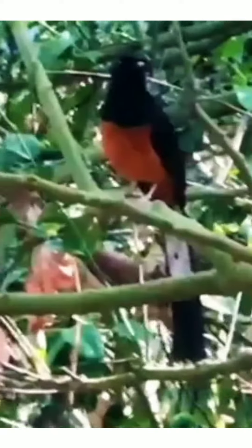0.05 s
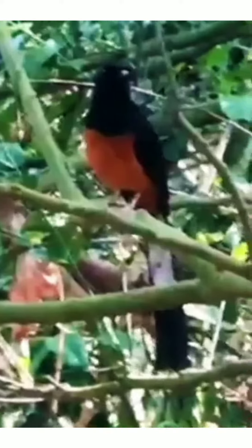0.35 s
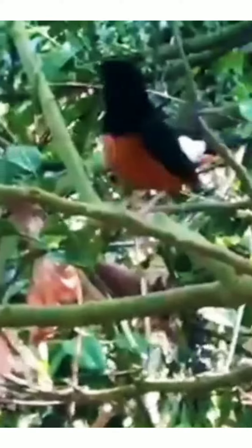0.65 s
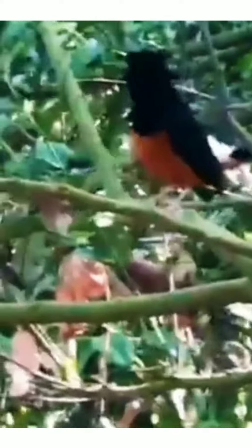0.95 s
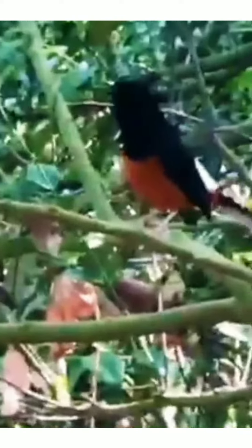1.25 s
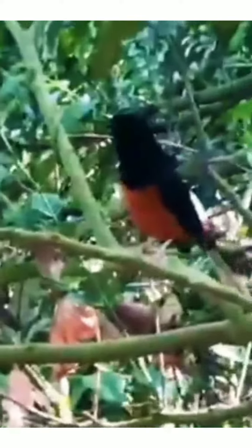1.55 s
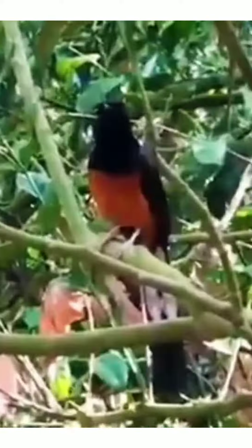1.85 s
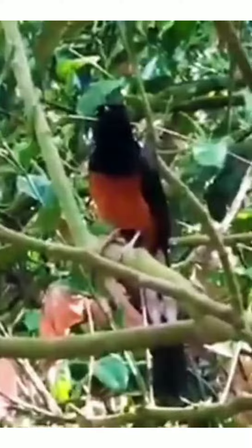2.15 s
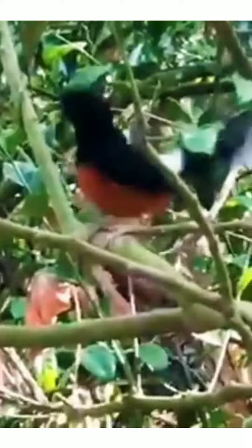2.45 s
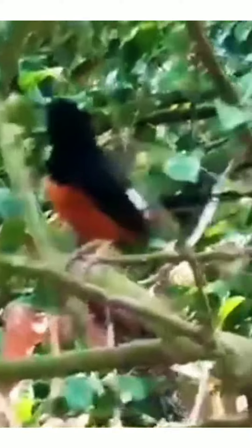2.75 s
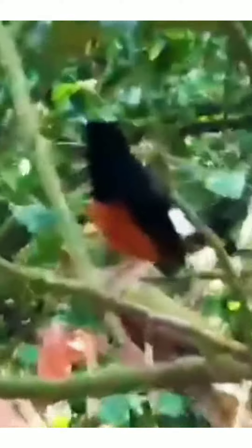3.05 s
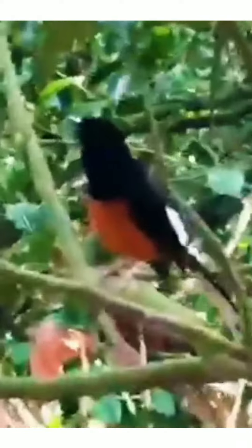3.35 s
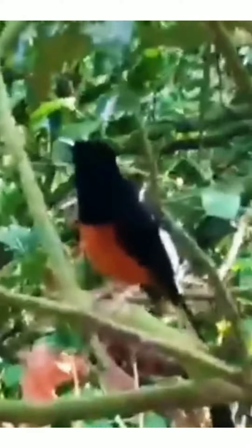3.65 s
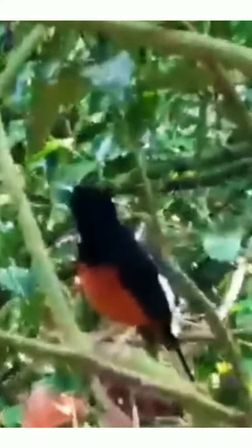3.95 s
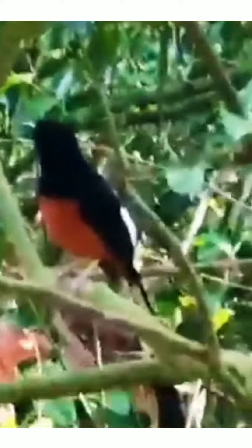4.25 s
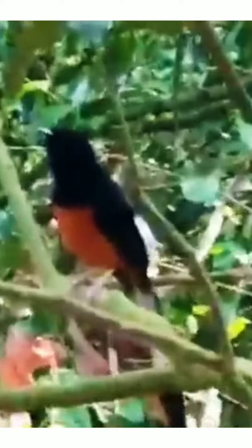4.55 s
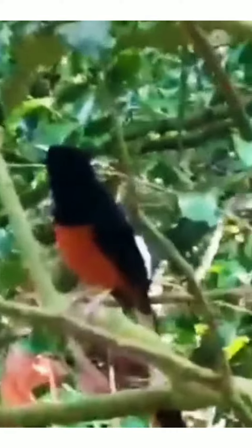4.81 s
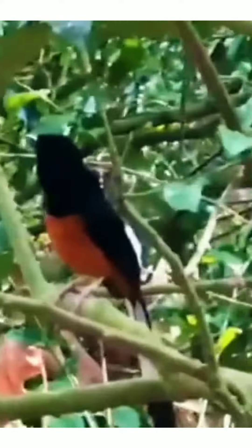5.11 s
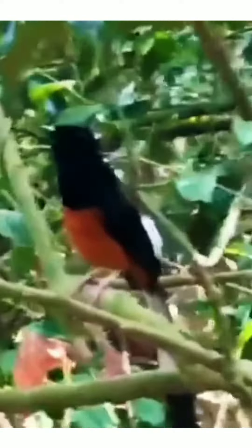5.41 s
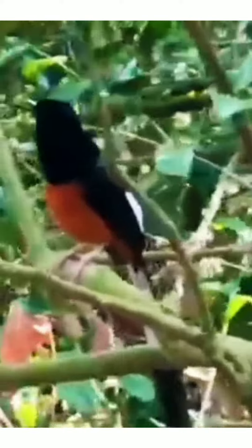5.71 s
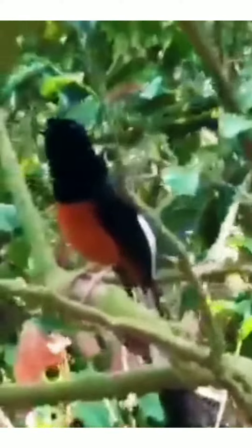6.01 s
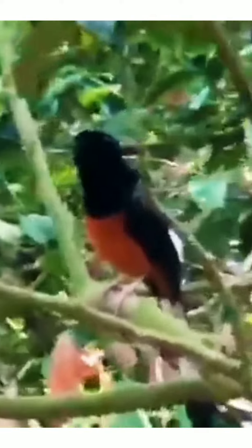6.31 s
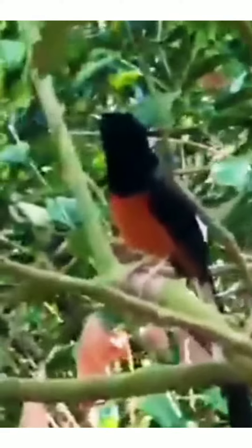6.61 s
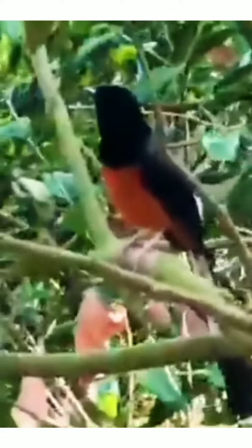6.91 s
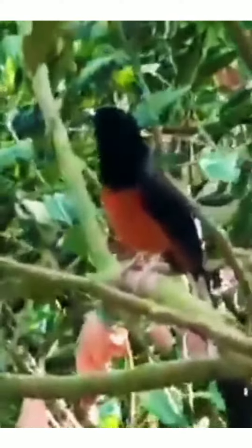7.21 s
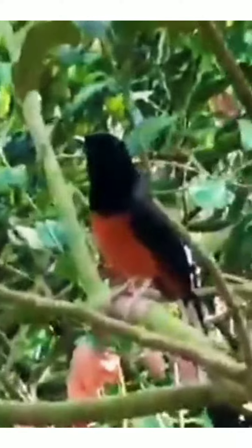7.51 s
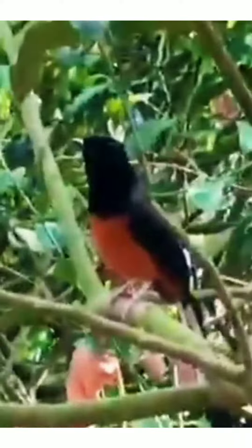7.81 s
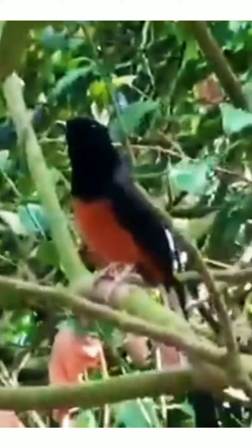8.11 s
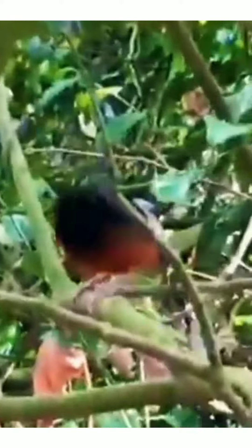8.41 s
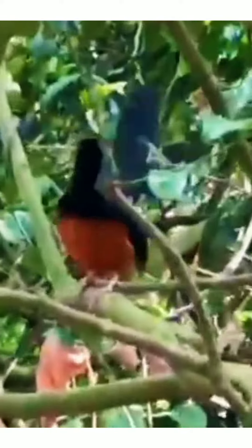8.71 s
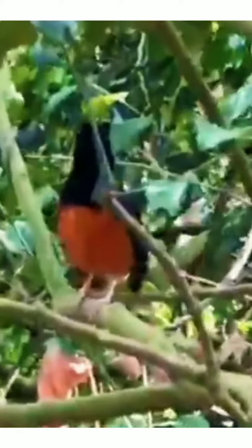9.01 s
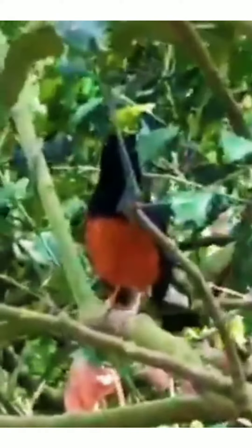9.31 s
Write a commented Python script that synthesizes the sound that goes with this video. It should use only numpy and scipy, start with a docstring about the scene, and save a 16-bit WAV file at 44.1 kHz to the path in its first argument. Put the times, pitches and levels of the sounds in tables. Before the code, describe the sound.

A songbird sings close by with thin high notes, dry clicking calls, loud whistles and fast warbles over a quiet outdoor rumble.

```python
"""A shama sings close by in leafy branches, over a quiet rumble and a far twitter. It opens with thin high
notes, arched notes and low rasps, all tones of its syrinx; twigs tick. Runs of dry 'tuk' calls come at
1.3 and 3.3 s, a harsh double 'chack' at 3.9 s, then pure whistles, arches, fast warbles and a swoop.
Softer song answers from further off, mostly at 7-8.7 s; a whistle and a warble close near 9 s.
Nearby surfaces echo the song."""
import sys
import numpy as np
from scipy import signal
from scipy.fft import rfft, irfft
from scipy.io import wavfile
from scipy.ndimage import uniform_filter1d

SR = 44100
rng = np.random.default_rng(int(sys.argv[2]) if len(sys.argv) > 2 else 0)


def dump(signal):
    """Clip the signal to [-1, 1] and save it as 16-bit WAV at the path in sys.argv[1]."""
    limited = np.clip(np.atleast_2d(signal).T, -1, 1)
    pcm = np.round(limited * 32767).astype(np.int16)
    wavfile.write(sys.argv[1], SR, pcm)


N = 417186

# spectrum of chacks and twig ticks: f/Hz, gain/dB
CRACK_SPECTRUM = [(410, -70), (700, -20.5), (952, -23), (1650, -1.5), (2340, 1), (3570, -7), (4320, -2),
                  (5310, -3.5), (6350, -6.5), (8000, -8), (10200, -18), (12700, -13.5), (15000, -24)]


def undb(db):
    """Decibels to gain."""
    return 10 ** (np.asarray(db) / 20)


def unit(x):
    """Scale to rms 1."""
    return x / np.sqrt(np.mean(x ** 2) + 1e-18)


def add(out, start_s, x):
    """Mix x into out from start_s on."""
    i = max(int(start_s * SR), 0)
    out[i:i + len(x)] += x[:max(len(out) - i, 0)]


def gain_at(hz, curve):
    """Gain of an (f/Hz, gain/dB) curve on a log-frequency axis."""
    f_hz, db = np.transpose(curve)
    return undb(np.interp(np.log(hz + 1), np.log(f_hz), db))


def colour(x, curve):
    """Filter by an (f/Hz, gain/dB) curve."""
    hz = np.arange(len(x) // 2 + 1) * SR / len(x)
    return irfft(rfft(x) * gain_at(hz, curve), len(x))


def ring(x, hz, width_hz):
    """One resonance, gain 1 at its centre."""
    return signal.lfilter(*signal.iirpeak(hz, hz / width_hz, fs=SR), x)


def wander(size, hz):
    """Random drift up to about hz, rms near 1."""
    knots = rng.standard_normal(4096)
    return np.sqrt(3 / 2) * np.interp(np.arange(size) * 2 * hz / SR, np.arange(len(knots)), knots)


def burst(t60_s, rise_s):
    """Noise with a linear rise and exponential decay."""
    t = np.arange(SR // 4) / SR
    decay = undb(-60 * np.maximum(t - rise_s, 0) / t60_s)
    return rng.standard_normal(len(t)) * np.minimum(t / rise_s, 1) * decay


def fade(x, edge_s):
    """Ramp both ends."""
    i = np.arange(len(x))
    return x * np.clip(np.minimum(i, i[::-1]) / (edge_s * SR), 0, 1)


def progress(length_s):
    """0 to 1 through a note."""
    return np.linspace(0, 1, max(int(length_s * SR), 2))


def glide(u, from_hz, to_hz):
    """Even slide in log pitch."""
    return from_hz * (to_hz / from_hz) ** u


def swell(u, peak_at, rise_db, fall_db, curve=1.42):
    """Air pressure in dB re peak: one rise, one fall."""
    before_db = rise_db * np.abs(1 - u / peak_at) ** curve
    after_db = fall_db * np.abs((u - peak_at) / (1 - peak_at)) ** curve
    return -np.where(u < peak_at, before_db, after_db)


def gesture(points, smooth_s=.0027):
    """Start time and smoothed muscle controls from (t/s, ...) points."""
    times_s, *columns = np.transpose(points)
    t = np.arange(times_s[0], max(times_s[-1], times_s[0] + smooth_s), 1 / SR)
    return times_s[0], [uniform_filter1d(np.interp(t, times_s, c), int(smooth_s * SR)) for c in columns]


def syrinx(hz, db, overtone_db, jitter, flutter, jitter_hz=250):
    """Near-sine membrane tone; weak, unsteady overtones pass the fixed throat resonances."""
    # overtones through throat and beak: f/Hz, level/dB re fundamental
    throat = [(2000, -25.5), (3000, -40.5), (4100, -55), (5300, -39.5), (6700, -40), (8100, -36.5),
              (9400, -30), (10700, -37.5), (11800, -38.5), (13300, -42), (15500, -45)]
    hz = hz * (1 + jitter * wander(len(hz), jitter_hz))
    phase = 2 * np.pi * np.cumsum(hz) / SR
    tone = np.sin(phase)
    for k in range(2, 9):
        strength = undb(overtone_db + 6.5 * wander(len(hz), hz=70))
        tone += strength * gain_at(np.abs(k * hz), throat) * (k * hz < SR / 2) * np.sin(k * phase)
    gain = undb(db) * np.exp(flutter * wander(len(hz), jitter_hz))
    return np.sqrt(2) * gain * fade(tone, edge_s=.0025)


def strained(hz, db, strain):
    """Strain (0-1) turns a pure note bright and ragged."""
    return syrinx(hz, db, overtone_db=15 * strain, jitter=.002 + .05 * strain,
                  flutter=.034 + .2 * strain, jitter_hz=220)


def plain_notes(notes, **voice):
    """Syrinx notes that follow (t/s, f/Hz, level/dB) points."""
    out = np.zeros(N)
    for note in notes:
        start_s, (hz, db) = gesture(note)
        add(out, start_s, syrinx(hz, db, **voice))
    return out


def air(level_db=-47):
    """Quiet, steady outdoor rumble."""
    # f/Hz, gain/dB
    spectrum = [(15, -51.5), (25, -26), (49, -2), (224, -3.5), (438, -13), (543, -12.5), (588, -14),
                (637, -14), (1860, -18.5), (2780, -24), (3350, -22), (4040, -26.5), (5140, -32),
                (7090, -30), (15000, -40)]
    return undb(level_db) * unit(colour(rng.standard_normal(N), spectrum))


def scatter(x, t60_s, onset_s):
    """Diffuse tail of the surroundings."""
    # f/Hz, gain/dB
    spectrum = [(200, -13), (1000, -4), (2200, -5.5), (4500, 6.5), (9000, -0.5), (15000, 6)]
    t = np.arange(SR) / SR
    envelope = np.minimum(t / onset_s, 1) * undb(-60 * t / t60_s)
    tail = colour(rng.standard_normal(SR), spectrum) * envelope
    return signal.fftconvolve(x, unit(tail) / np.sqrt(SR))[:N]


def reflections(x):
    """Direct sound plus echoes off the nearest surfaces."""
    # delay/s, gain/dB
    echoes = [(.0032, -21), (.0056, -11.5), (.0094, -15), (0.0158, -17.5), (0.029, -22.5)]
    out = x.copy()
    for delay_s, db in echoes:
        add(out, delay_s, undb(db) * x)
    return out


def far_slides(notes, edge_db, **voice):
    """Distant notes: one even slide each, loudest in the middle."""
    out = np.zeros(N)
    for start_s, length_s, from_hz, to_hz, db in notes:
        u = progress(length_s)
        add(out, start_s, syrinx(glide(u, from_hz, to_hz), db - edge_db * (2 * u - 1) ** 2, **voice))
    return out


def far_tones():
    """Faint low tones from far away."""
    # t/s, length/s, from/Hz, to/Hz, level/dB
    notes = [(2.55, .3, 728, 754, -54.5), (3.15, .32, 665, 600, -53.5), (7.76, 0.51, 611, 623, -59),
             (8.26, .12, 960, 1050, -52), (8.56, .12, 534, 550, -53), (8.8, 0.67, 689, 605, -60)]
    return far_slides(notes, edge_db=7, overtone_db=-.5, jitter=.012, flutter=.57, jitter_hz=40)


def far_twitter():
    """A distant high note that wavers."""
    # t/s, f/Hz, level/dB, swing/Hz, rate/Hz
    points = [(0, 3960, -60, 220, 13.5), (.35, 3880, -57.5, 300, 5.8), (.67, 3880, -54, 253, 9.8)]
    out = np.zeros(N)
    start_s, (hz, db, swing_hz, rate_hz) = gesture(points)
    waver_hz = swing_hz * np.cos(2 * np.pi * np.cumsum(rate_hz) / SR)
    add(out, start_s, syrinx(hz - waver_hz, db, overtone_db=-9, jitter=.022, flutter=.017))
    return out


def far_song():
    """Soft slides of the far singer."""
    # t/s, length/s, from/Hz, to/Hz, level/dB
    notes = [ (0, 0.063, 1764, 1700, -44), (2.08, .14, 2770, 3200, -48), (4.84, .1, 1954, 1458, -32),
             (5.0, .1, 1348, 2100, -29.5), (5.09, .19, 2700, 3050, -44.5), (5.28, 0.22, 3033, 3227, -41),
             (5.465, .025, 3100, 2300, -34), (5.68, .07, 2060, 1480, -28), (7.07, .1, 2600, 2670, -50),
             (7.17, .09, 2710, 2760, -39), (7.35, .11, 2190, 2120, -36), (7.44, .11, 2160, 2330, -37),
             (7.58, .1, 2080, 1475, -33.5), (7.57, 0.17, 2180, 2425, -41.5), (7.74, .14, 1428, 2202, -29),
             (7.87, .14, 2675, 3130, -41.5), (8.05, .06, 1430, 1720, -35), (8.1, .075, 1850, 2700, -39),
             (8.1, .16, 3098, 3258, -38.5), (8.395, 0.023, 2235, 2345, -36), (8.425, .07, 1900, 1046, -41),
             (8.495, 0.064, 2000, 1333, -27.5), (8.555, 0.071, 2050, 1480, -30),
             (8.61, 0.17, 1530, 1397, -40), (8.645, 0.088, 1897, 3110, -37), (9.18, 0.052, 3000, 3294, -37),
             ]
    return far_slides(notes, edge_db=14, overtone_db=-7.5, jitter=.014, flutter=.3, jitter_hz=120.2)


def twigs(knock_rise_s=.005):
    """Dry ticks of twigs and leaves, and a few dull knocks."""
    # t/s, level/dB
    tick_events = [(0.558, -27), (0.655, -26.5), (1.274, -27), (2.102, -32), (2.195, -31), (2.895, -23),
                   (2.918, -23), (5.52, -31), (4.03, -38), (6.872, -47), (7.066, -44), (7.414, -33),
                   (8.136, -25.5), (8.521, -18.5), (8.531, -28), (8.698, -29.5)]
    # t/s, f/Hz, level/dB
    knock_events = [(2.9, 343, -39), (2.92, 320, -30), (3.481, 266, -33), (3.506, 220, -33)]
    ticks, knocks = np.zeros(N), np.zeros(N)
    for start_s, db in tick_events:
        add(ticks, start_s, undb(db) * burst(t60_s=.025, rise_s=.0026))
    t = np.arange(SR // 4) / SR
    blow = t / knock_rise_s * np.exp(1 - t / knock_rise_s)
    for start_s, hz, db in knock_events:
        body = unit(ring(rng.standard_normal(len(t)), hz, width_hz=260))
        add(knocks, start_s, undb(db) * body * blow)
    return undb(3) * colour(ticks, CRACK_SPECTRUM) + knocks


def chacks():
    """Harsh chacks and bill snaps: broadband cracks, each trailing a hoarse hiss."""
    # t/s, level/dB, t60/s
    calls = [(2.381, -26.5, 0.057), (2.392, -47, .02), (3.858, -27, 0.064), (3.873, -7.5, 0.013),
             (3.925, -10.5, 0.031), (3.935, -15.5, 0.038)]
    out = np.zeros(N)
    for start_s, db, t60_s in calls:
        crack = burst(t60_s, rise_s=.0035)
        hiss = undb(-12) * burst(t60_s=.27, rise_s=.0062)
        add(out, start_s, undb(db) * (crack + hiss))
    return undb(5) * colour(out, CRACK_SPECTRUM)


def tuks(peak_s=.0051, length_s=.0094):
    """Each 'tuk' is a steep downward flick, with no bass below about 850 Hz."""
    # t/s, level/dB, f/Hz
    calls = [(1.3144, -16, 2060), (1.3736, -16, 2130), (1.4346, -17, 2043), (1.499, -18.5, 1930),
             (1.5564, -20, 2020), (1.6274, -20.5, 2065), (1.702, -23.5, 1990), (3.256, -13, 2050),
             (3.3282, -13.5, 1963), (3.3852, -15, 1920), (3.4451, -15.5, 1900), (3.509, -15.5, 1990),
             (3.5721, -18.5, 1985)]
    notes = [[(t, hz, db - 12), (t + peak_s, hz, db - .5), (t + length_s, .88 * hz, db - 12)]
             for t, db, hz in calls]
    flicks = plain_notes(notes, overtone_db=5, jitter=.08, flutter=.2, jitter_hz=500)
    return signal.sosfilt(signal.butter(4, 850, "high", fs=SR, output="sos"), flicks)


def zing(length_s, hz, db, hop_s=.042, settle_s=.035, flick_s=.012):
    """Pitch, level, buzz swing of a held note: overshoots, swells as the buzz narrows, flicks down."""
    u = progress(length_s)
    t = u * length_s
    pressure_db = swell(u, peak_at=.72, rise_db=16, fall_db=5)
    hop_oct = .25 * np.cos(2 * np.pi * t / hop_s) * np.exp(-t / settle_s)
    flick_oct = .2 * np.maximum(1 - (length_s - t) / flick_s, 0)
    swing_hz = 100 - 16 * pressure_db
    return hz / 2 ** (hop_oct + flick_oct), db + pressure_db, swing_hz


def tsip(length_s, hz, db, swing_hz=240, climb_oct=.14, fall_oct=.52, fall_at=.75):
    """Pitch, level, buzz swing of a two-beat note that falls away."""
    u = progress(length_s)
    fall = np.maximum(u - fall_at, 0) / (1 - fall_at)
    bend_oct = climb_oct * (u - .5) - fall_oct * fall
    gap_db = 15 * np.cos(2 * np.pi * u) ** 2 * (1 - fall / 4)
    return hz * 2 ** bend_oct, db - gap_db, swing_hz


def thin_notes(buzz_hz=130):
    """High side of the syrinx: rising lisps and buzzing notes ring a narrow resonance."""
    # t/s, level/dB
    lisps = [(.828, -32), (0.861, -34), (0.913, -27.5), (0.969, -30), (1.033, -33.5), (1.094, -31.5),
             (4.903, -37.5), (4.967, -35.5), (5.023, -34.5), (5.079, -36), (5.135, -35.5), (5.192, -39.5)]
    # both: t/s, length/s, f/Hz, level/dB
    zings = [(.69, .138, 4172, -23.5), (3.059, .12, 4270, -27.5), (3.358, .149, 4231, -24.5),
             (4.609, .165, 4374, -25.5), (6.547, .143, 4338, -24.5)]
    tsips = [(.422, 0.1, 5550, -31), (1.862, .1, 5330, -29), (2.72, .11, 5100, -43),
             (4.38, .122, 5204, -30), (6.296, 0.11, 5240, -30.5)]
    rises = [[(t, 4600, db - 7), (t + .024, 5500, db), (t + .04, 5500, db - 7)] for t, db in lisps]
    out = plain_notes(rises, overtone_db=1, jitter=.022, flutter=.15, jitter_hz=300)
    for shape, notes in (zing, zings), (tsip, tsips):
        for start_s, *note in notes:
            hz, db, swing_hz = shape(*note)
            rate_hz = buzz_hz * (1 + .18 * wander(len(hz), hz=80))
            buzz = np.sin(2 * np.pi * np.cumsum(rate_hz) / SR)
            tone = syrinx(hz + swing_hz * buzz, db, overtone_db=11, jitter=.25 * swing_hz / hz,
                          flutter=.2, jitter_hz=220)
            add(out, start_s, tone)
    return undb(-2.5) * out + undb(-7) * ring(out, hz=4270, width_hz=220)


def rasps(sag_oct_per_db=.011, doubling_per_db=.028):
    """Low notes: below peak pressure the pitch sags and period doubling adds half-order harmonics."""
    # t/s, length/s, peak position/0-1, top f/Hz, level/dB, doubling at peak/0-1
    notes = [ (1.065, 0.093, .26, 1061, -20, 0.09), (1.252, 0.031, 0.52, 1380, -31, .8),
             (1.815, .09, .4, 1090, -25.5, .55), (3.064, .052, .45, 1240, -19.5, 0.06),
             (3.105, .052, .45, 1193, -25.5, .9), (3.691, 0.093, 0.54, 1150, -25, .4),
             (3.805, .04, 0.37, 1230, -32.5, .15), ]
    # open throat: f/Hz, gain/dB
    throat = [(520, -27), (750, -21), (1050, 9), (1650, 4.5), (2300, -7.5), (3100, -17.5), (4100, -26),
              (5500, -20), (7200, -21), (9300, -15), (11500, -37), (14000, -24)]
    out = np.zeros(N)
    for start_s, length_s, peak_at, top_hz, db, min_doubling in notes:
        pressure_db = swell(progress(length_s), peak_at, rise_db=22, fall_db=23, curve=1.3)
        doubling = np.clip(min_doubling - doubling_per_db * pressure_db, 0, 1)
        hz = top_hz * 2 ** (sag_oct_per_db * pressure_db)
        hz *= 1 + .07 * doubling * wander(len(hz), hz=260)
        half_phase = np.pi * np.cumsum(hz) / SR
        tone = np.zeros(len(hz))
        for k in range(1, 27):  # k = 2 is the fundamental
            strength = 1 if k == 2 else doubling * gain_at(k * hz / 2, throat) * (k * hz < SR)
            flutter_db = 6.5 * doubling * wander(len(hz), hz=130)
            tone += strength * undb(flutter_db) * np.sin(k * half_phase)
        add(out, start_s, np.sqrt(2) * undb(db + pressure_db) * fade(tone, edge_s=.005))
    return out


def slides():
    """Short slides that steepen and swell towards their end."""
    # t/s, length/s, from/Hz, to/Hz, level/dB, strain/0-1
    notes = [ (.8, .033, 1120, 1670, -20, .4), (.948, .035, 860, 1150, -18, .3),
             (2.03, .024, 1620, 2230, -15, .25), (2.778, .051, 1130, 1500, -18, .2),
             (2.94, .025, 850, 1330, -20, .4), (3.835, .036, 1400, 2550, -29, .9),
             (8.895, .027, 4000, 2750, -39, .7), (9.432, .04, 1074, 1250, -20, 0), ]
    out = np.zeros(N)
    for start_s, length_s, from_hz, to_hz, db, strain in notes:
        u = progress(length_s)
        pressure_db = swell(u, peak_at=.76, rise_db=22, fall_db=5)
        add(out, start_s, strained(glide(u ** 1.3, from_hz, to_hz), db + pressure_db, strain))
    return out


def whistles():
    """Long, pure, freely shaped whistles."""
    # one curve a note: t/s, f/Hz, level/dB
    notes = [
        [(4.35, 2910, -50), (4.364, 2800, -47), (4.408, 2733, -33.5), (4.48, 2512, -21), (4.51, 2504, -20),
         (4.527, 2420, -36)],
        [(4.605, 2082, -37), (4.617, 2190, -39), (4.667, 2184, -28.5), (4.711, 2513, -20), (4.807, 2657, -19),
         (4.825, 2654, -20), (4.835, 2561, -34)],
        [(4.908, 2180, -40), (4.922, 2183, -28), (4.944, 2142, -37), (4.994, 2140, -21), (5.0, 2144, -26),
         (5.022, 2090, -15), (5.033, 2071, -32)],
        [(8.92, 2667, -46), (8.932, 2653, -28), (8.946, 2700, -23), (8.97, 2641, -15), (8.986, 2689, -20),
         (9.1, 2930, -19.5), (9.127, 2934, -33)],
    ]
    return plain_notes(notes, overtone_db=-1, jitter=.004, flutter=.03, jitter_hz=220)


def swoop(brighten_db_per_oct=40):
    """One whistle that dives and climbs, brighter the higher it is."""
    # t/s, f/Hz, level/dB
    points = [(6.285, 4120, -44), (6.303, 3840, -38), (6.337, 2490, -17.5), (6.395, 2323, -18.5),
              (6.409, 2556, -19), (6.435, 3430, -30.5), (6.447, 3330, -36)]
    out = np.zeros(N)
    start_s, (hz, db) = gesture(points)
    overtone_db = -2 + brighten_db_per_oct * np.log2(hz / hz.min())
    add(out, start_s, syrinx(hz, db, overtone_db, jitter=.003, flutter=.03, jitter_hz=220))
    return out


def warbles(onset_s=.019, swing_cost_db=4):
    """Plain glides until a fast, uneven pitch swing sets in and costs some level."""
    # t/s, length/s, from/Hz, to/Hz, bend (<1 = early), level/dB, peak position/0-1, rise/dB,
    # plain part/s, swing/Hz, rate/Hz
    notes = [ (5.777, 0.22, 1380, 2700, 1.1, -9.5, 0.62, 10, 0.0051, 160, 101),
             (6.075, .19, 2230, 1540, .55, -13, 0.28, 13, .045, 155, 63),
             (9.205, 0.18, 2600, 2380, .3, -8.5, .38, 26.5, .08, 254, 45), ]
    out = np.zeros(N)
    for start_s, length_s, from_hz, to_hz, bend, db, peak_at, rise_db, plain_s, swing_hz, rate_hz in notes:
        u = progress(length_s)
        depth = np.clip((u * length_s - plain_s) / onset_s, 0, 1)
        cycles = np.cumsum((depth > 0) * rate_hz * (1 + .1 * wander(len(u), hz=30))) / SR
        hz = glide(u ** bend, from_hz, to_hz) - depth * swing_hz * np.sin(2 * np.pi * cycles)
        level_db = db + swell(u, peak_at, rise_db, fall_db=9, curve=1.9) - swing_cost_db * depth
        add(out, start_s, syrinx(hz, level_db, overtone_db=-.5, jitter=.011, flutter=.017))
    return out


def arches(scoop_lag_s=.045, drop_oct_per_s=28, muscle_lag_s=.005):
    """Loud notes scoop ever faster up to a hold, then drop, fading with distance from the held pitch."""
    # hold t/s, scoop/s, hold/s, drop/s, from/Hz, to/Hz, level/dB, strain/0-1
    notes = [ (.837, 0.0075, .014, 0.0089, 2800, 2743, -15.5, 1),
             (0.869, .012, 0.029, .003, 2942, 3115, -15.5, .8),
             (.993, .013, .046, .024, 2260, 2630, -7, .15),
             (1.232, .014, 0.029, .003, 2044, 2310, -16.5, 0.57),
             (2.067, 0.013, .015, 0.0076, 1850, 1790, -15.5, 0.2),
             (2.832, .005, 0.039, .003, 2265, 2777, -13.5, 0.49),
             (2.969, .007, .022, 0.0035, 2455, 2590, -6, .6),
             (2.997, 0.0031, 0.039, .016, 2418, 2553, -10, .55),
             (5.097, 0.021, 0.045, 0.012, 2021, 2138, -9.5, 0.04),
             (5.229, .045, .035, 0.011, 2047, 2112, -8.5, .03),
             (5.354, .042, .046, 0.011, 2080, 2120, -7, .03), (5.542, .02, .072, .028, 2080, 2650, -9, 0),
             (5.691, 0.0098, 0.011, 0.0094, 1290, 1260, -24, .1),
             (5.739, 0.0087, .012, 0.012, 1362, 1326, -17, 0.02), ]
    out = np.zeros(N)
    for at_s, scoop_s, hold_s, drop_s, from_hz, to_hz, db, strain in notes:
        t = np.arange(-scoop_s, hold_s + drop_s, 1 / SR)
        u = np.clip(t / hold_s, 0, 1)
        scoop_oct = 1.7 * (1 - np.exp(np.minimum(t, 0) / scoop_lag_s))
        drop_oct = drop_oct_per_s * np.maximum(t - hold_s, 0)
        hz = glide(u, from_hz, to_hz) / 2 ** (scoop_oct + drop_oct)
        level_db = db - 4 * (2 * u - 1) ** 2 - 21 * np.sqrt(scoop_oct) - 14 * np.sqrt(drop_oct)
        hz, level_db = uniform_filter1d([hz, level_db], int(muscle_lag_s * SR))
        add(out, at_s - scoop_s, strained(hz, level_db, strain))
    return out


def scene():
    """Near bird, far singers and air; only the chacks have stereo width."""
    # direct-path treble loss, beak pointing past the listener: f/Hz, gain/dB
    off_axis = [(3000, 0), (5500, -1), (7000, -8), (9500, -5), (15000, -8)]
    harsh = chacks()
    cracks = harsh + twigs()
    song = whistles() + swoop() + arches() + slides() + warbles() + rasps() + thin_notes() + tuks()
    far = far_song() + far_twitter() + far_tones()
    mid = air() + reflections(colour(song, off_axis) + cracks)
    mid += undb(-8.5) * scatter(song + cracks, t60_s=.38, onset_s=.008)
    mid += undb(-.5) * far + undb(6) * scatter(far, t60_s=.45, onset_s=.0037)
    side = undb(-8) * scatter(harsh, t60_s=.03, onset_s=.002)
    side = signal.sosfilt(signal.butter(8, 4000, "high", fs=SR, output="sos"), side)
    return np.array([mid + side, mid - side])


def record(dry):
    """Steep low-pass at 15.2 kHz."""
    return signal.sosfilt(signal.ellip(8, .2, 70, 15200, fs=SR, output="sos"), dry)


dry = scene()
out = record(dry)
dump(out)
```